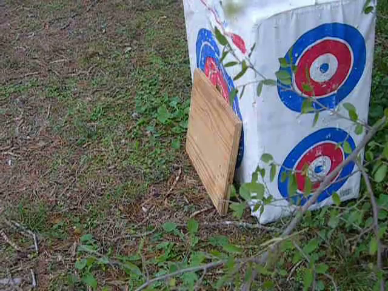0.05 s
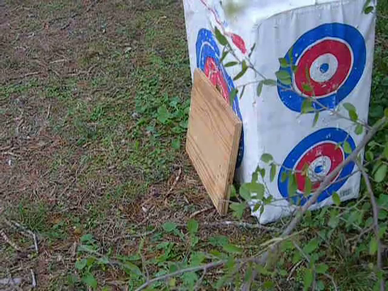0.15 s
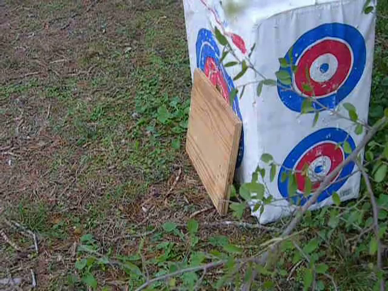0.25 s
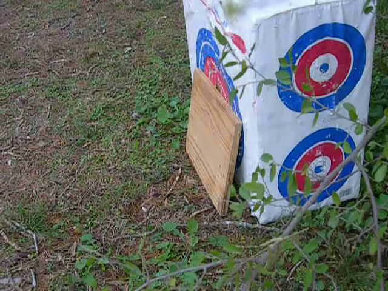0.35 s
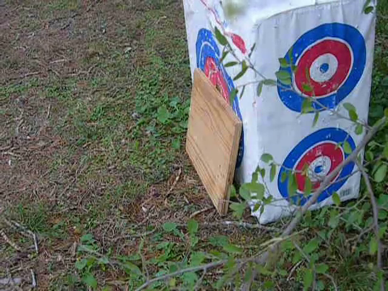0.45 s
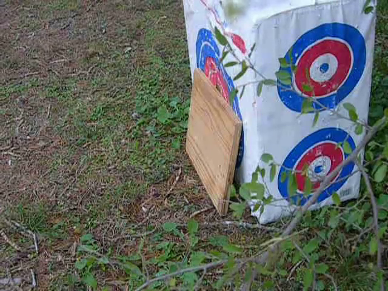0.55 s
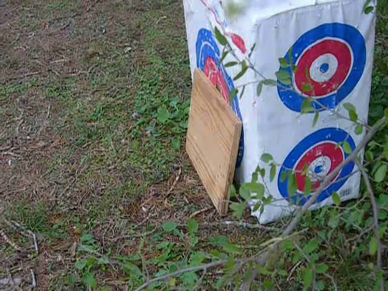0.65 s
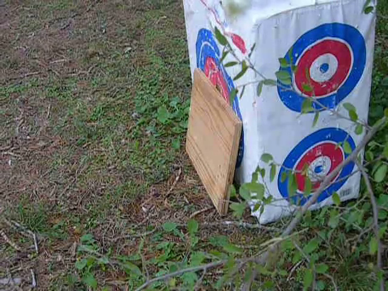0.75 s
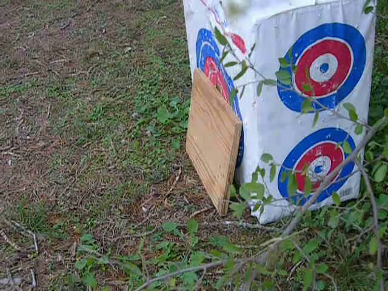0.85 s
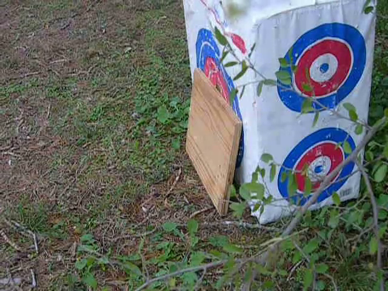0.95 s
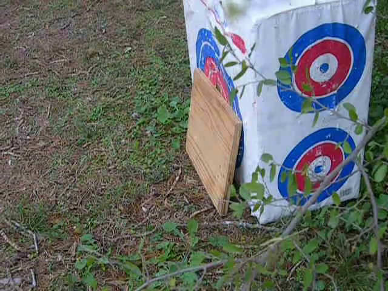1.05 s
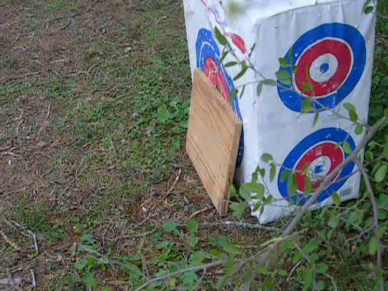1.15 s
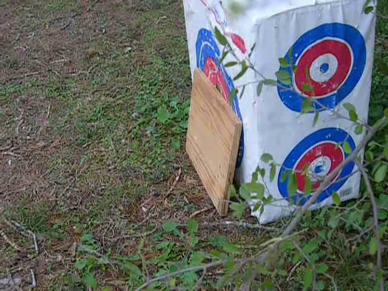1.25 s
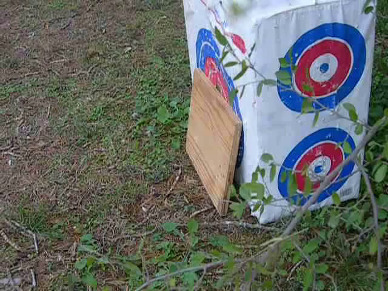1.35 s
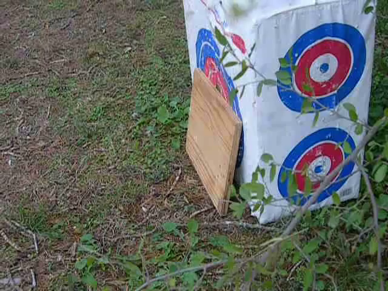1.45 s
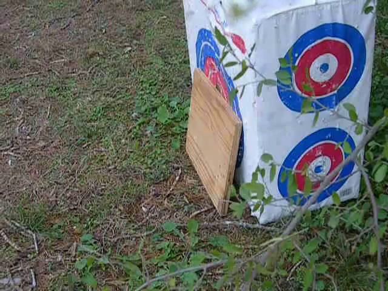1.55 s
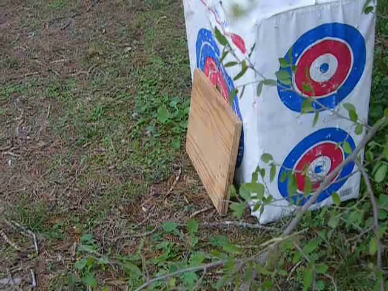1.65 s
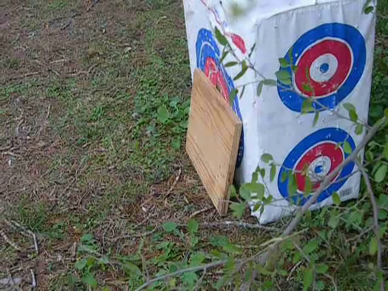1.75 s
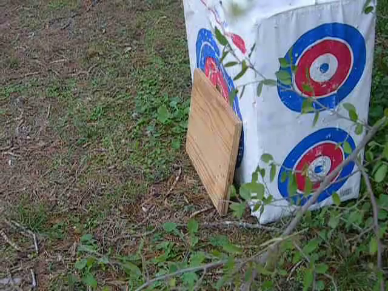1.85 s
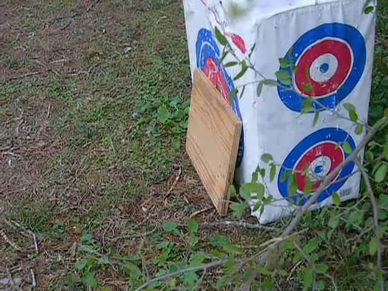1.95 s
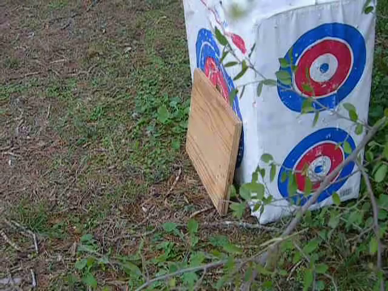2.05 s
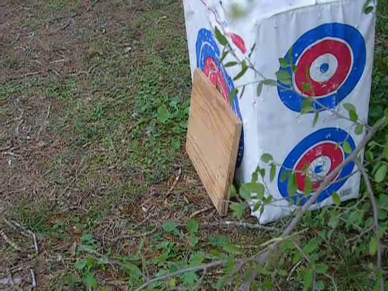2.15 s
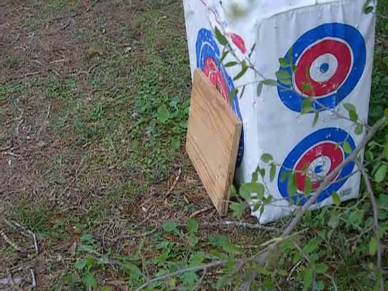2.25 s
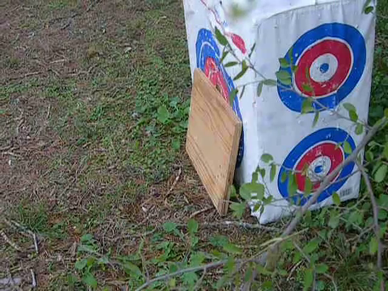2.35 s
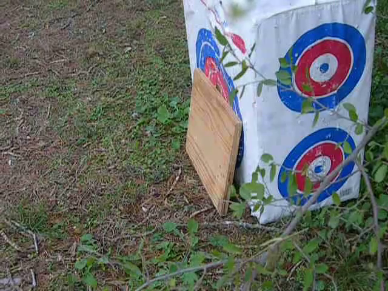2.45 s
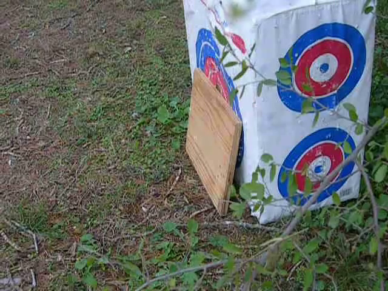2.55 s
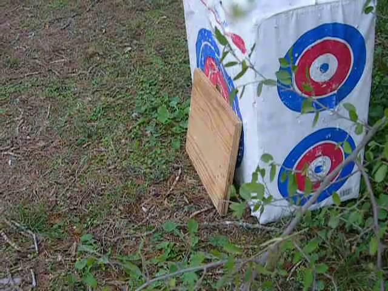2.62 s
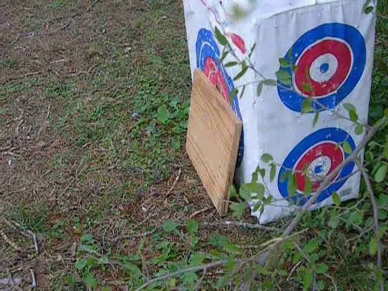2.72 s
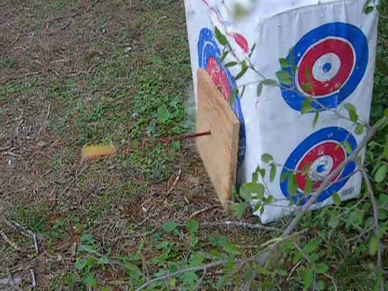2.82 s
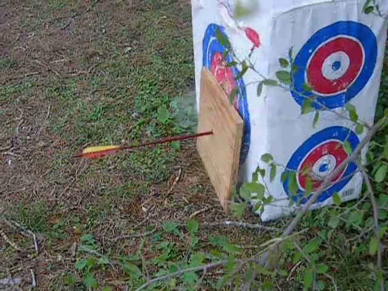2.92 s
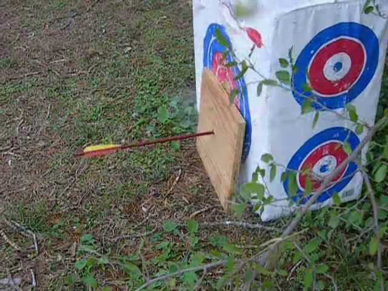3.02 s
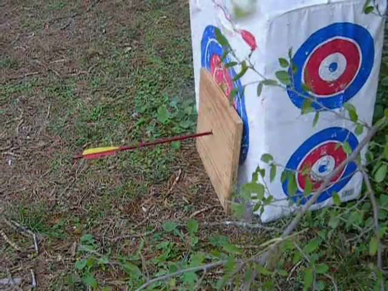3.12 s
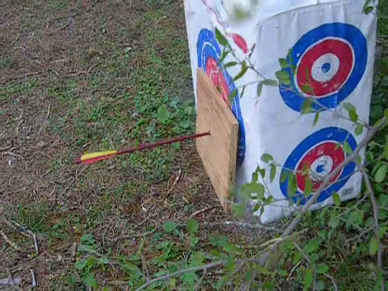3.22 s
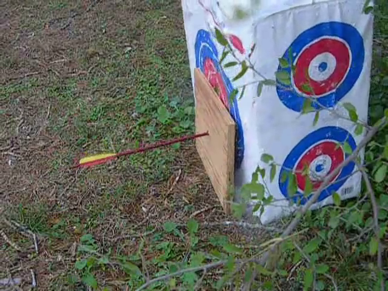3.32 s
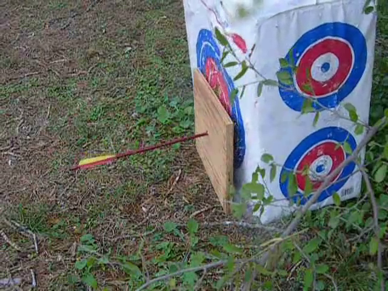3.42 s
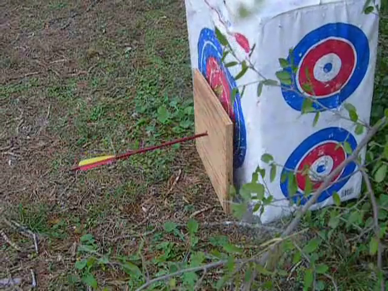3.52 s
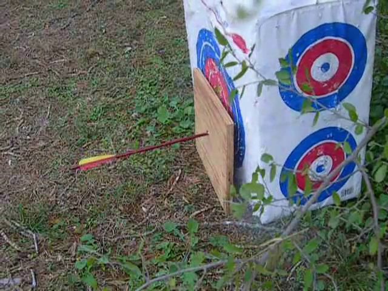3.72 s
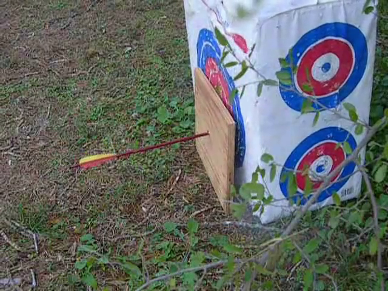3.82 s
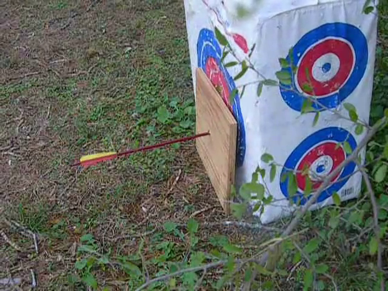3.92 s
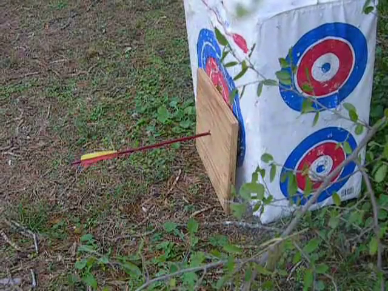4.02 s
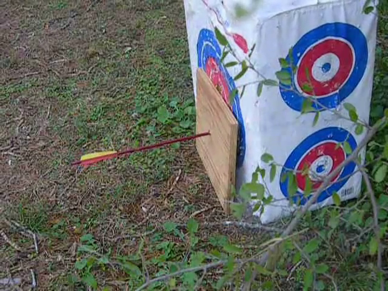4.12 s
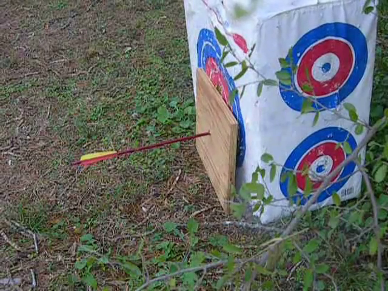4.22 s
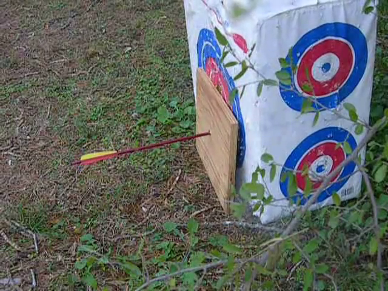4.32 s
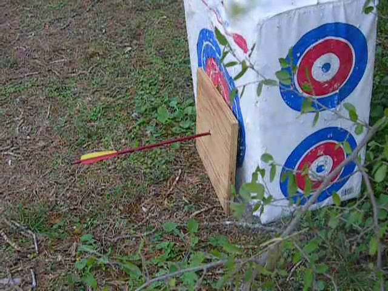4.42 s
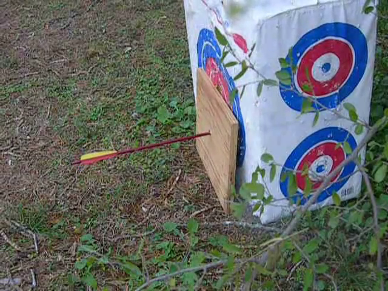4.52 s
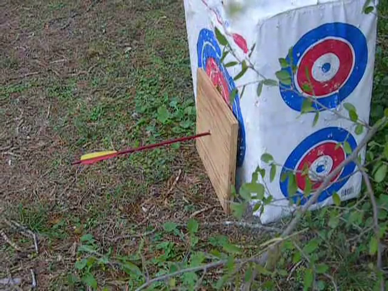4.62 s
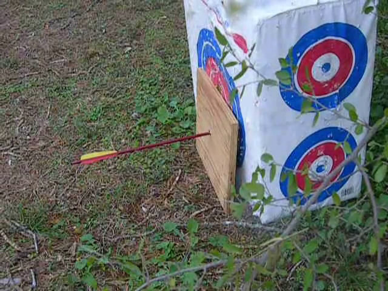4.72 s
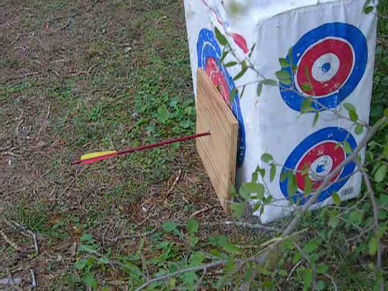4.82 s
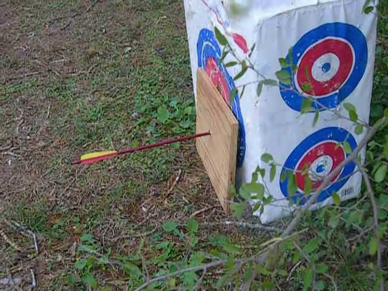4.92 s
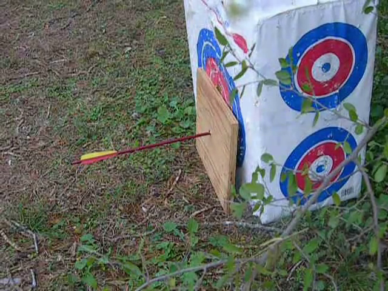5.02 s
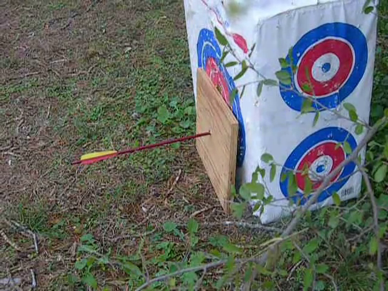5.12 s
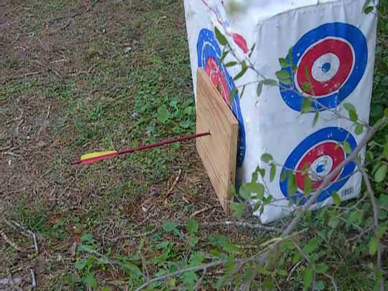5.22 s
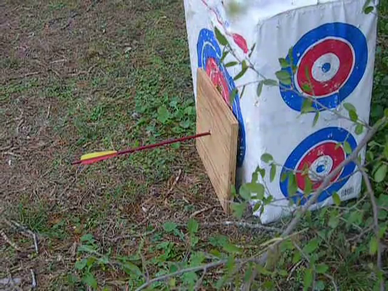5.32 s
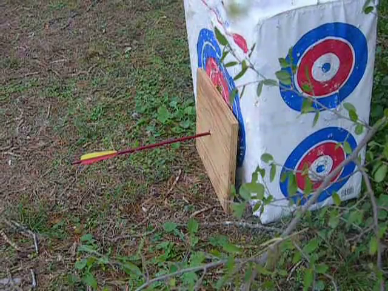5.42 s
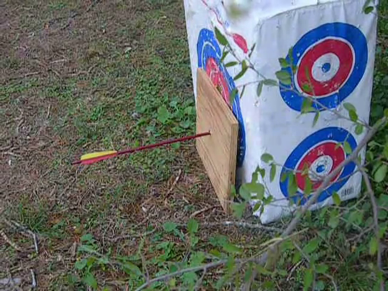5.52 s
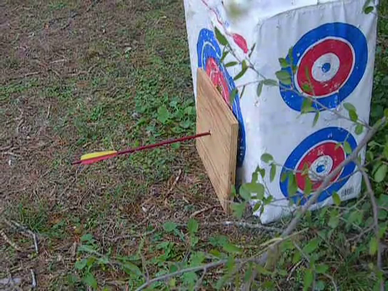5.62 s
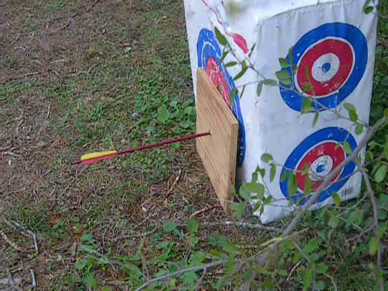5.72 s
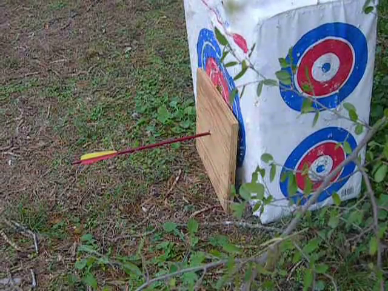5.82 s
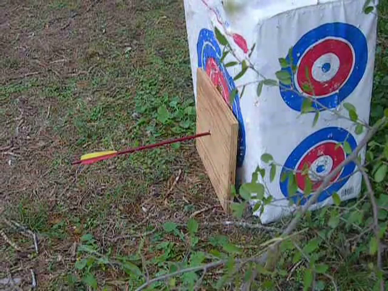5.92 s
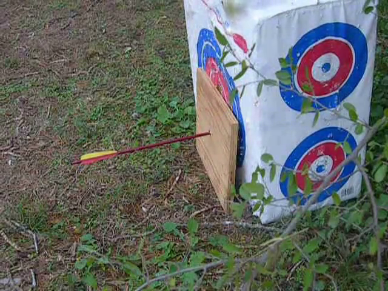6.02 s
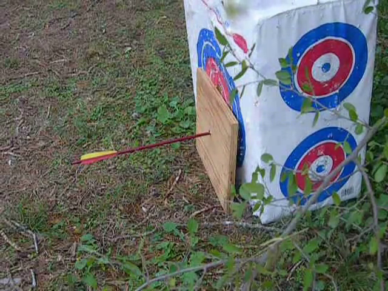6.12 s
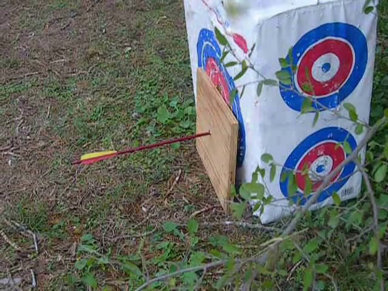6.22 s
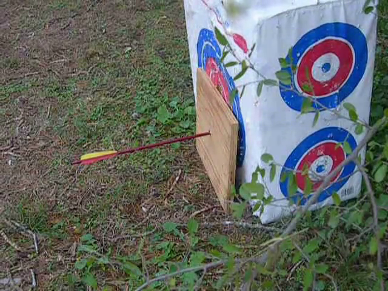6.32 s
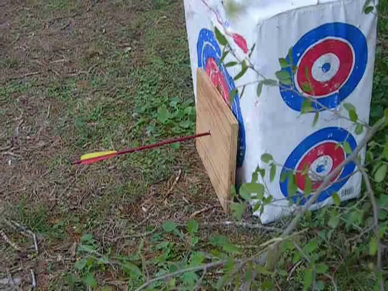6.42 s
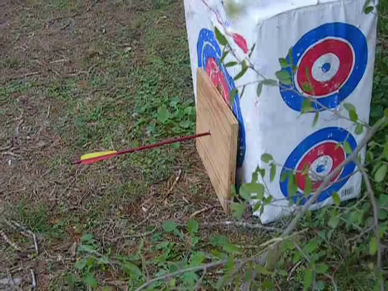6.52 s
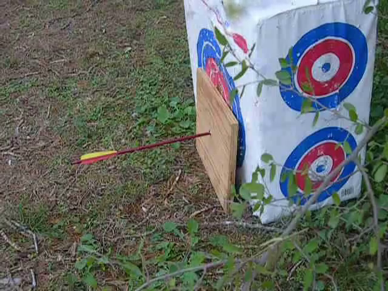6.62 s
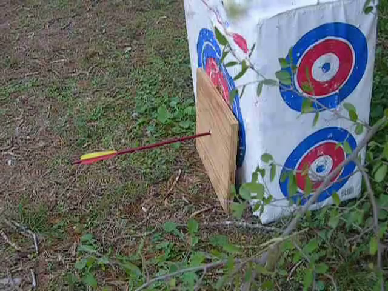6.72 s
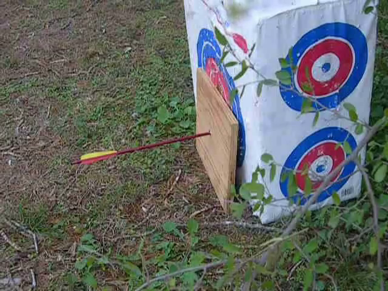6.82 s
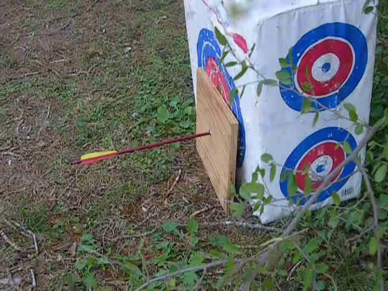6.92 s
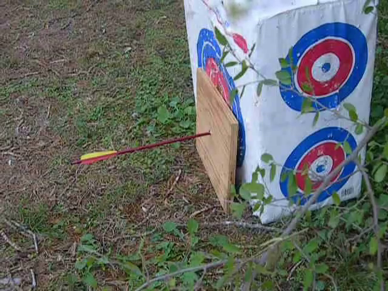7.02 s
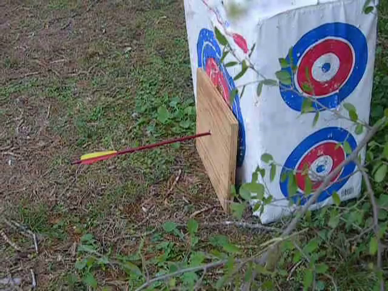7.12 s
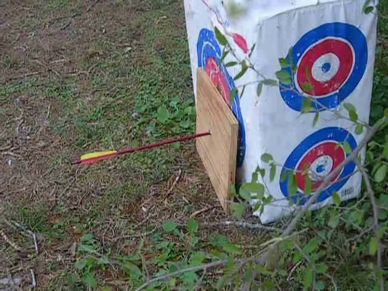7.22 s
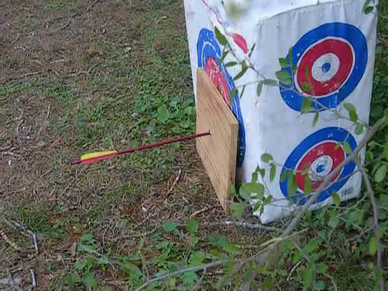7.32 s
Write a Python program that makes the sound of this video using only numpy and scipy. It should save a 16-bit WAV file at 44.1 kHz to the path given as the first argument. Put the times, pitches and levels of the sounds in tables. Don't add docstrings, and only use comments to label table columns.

```python
import sys
import numpy as np
from scipy import signal
from scipy.fft import rfft, irfft, next_fast_len
from scipy.io import wavfile
from scipy.ndimage import uniform_filter1d, map_coordinates

SR = 44100
rng = np.random.default_rng(int(sys.argv[2]) if len(sys.argv) > 2 else 0)


def field_ratio(decibels):
    return 10 ** (np.asarray(decibels, dtype=float) / 20)


def persist_wave(psi):
    counts = np.round(np.clip(psi, -1, 1) * 32767).astype(np.int16)
    wavfile.write(sys.argv[1], SR, np.atleast_2d(counts).T)


N = 324135

# frequency in Hz, density in dB per Hz.
HUM_SPECTRUM = [(88, -16), (150, -8), (317, -8.5), (390, -6), (505, -5.5), (729, -1.5), (871, -0.5),
                (945, -2.5), (1420, -7), (1870, -12), (2810, -13.5), (3500, -18.5), (3900, -56),
                (5070, -63), (8580, -120)]
# frequency in Hz, density in dB per Hz.
RUMBLE_SPECTRUM = [(12, -44), (20, -24), (32, -60), (49, -11), (135, 4.5), (220, -28.5), (290, -31),
                   (480, -120)]
# time in seconds, level in dB.
HUM_LEVEL = [(0, -38.5), (1.5, -38.5), (2.8, -39.5), (4.6, -38.5), (5.4, -39), (7, -39), (7.35, -37)]
# centre in seconds, lift over the rumble in dB.
PUFFS = [(.03, 6), (.255, 8), (.452, 14), (1.367, 1), (1.766, -4), (2.4, 12), (2.8, 3), (3.747, 0),
         (4.87, 5), (5.26, 8), (5.915, 13), (6.8, 9), (7.328, 2)]
PUFF_S = 0.056

# start in seconds, length in seconds, pitch in Hz, level in dB.
PEEPS = [(0, .085, 2640, -47.5), (.085, .28, 2620, -60), (.01, .12, 2360, -56), (.77, .11, 2950, -56),
         (1.69, .03, 2870, -49), (2.095, .03, 3160, -52), (2.63, .05, 2590, -55),
         (3.536, .022, 2950, -44.5), (3.98, .05, 2420, -54), (4.34, .03, 2360, -59),
         (4.535, .045, 2880, -53), (4.63, .09, 2870, -54), (4.74, .05, 2860, -52),
         (4.825, .04, 2850, -50.5), (5.02, .09, 3240, -59), (5.98, .11, 2800, -55.5),
         (6.11, .045, 2750, -53), (6.16, .11, 2750, -53.5), (6.52, .02, 2600, -52)]
# start in seconds, length in seconds, start pitch in Hz, end pitch in Hz, level in dB.
SLURS = [
    (2.305, .065, 3300, 2620, -51),
    (4.885, .1, 3450, 2580, -49.5),
    (4.98, .026, 2650, 3120, -51),
    (5.135, .065, 2000, 2360, -54),
    (5.2, .1, 2330, 2790, -57),
    (5.93, .05, 3080, 2920, -57),
    (6.535, .095, 1950, 2600, -53.5),
    (6.6, .05, 3400, 2900, -55),
    (6.67, .09, 2430, 2570, -58.5),
    (7.3, .049, 2780, 2400, -53),
]
# start in seconds, top pitch in Hz, level in dB.
CHIPS = [
    (2.113, 3070, -45.5),
    (2.12, 3310, -48.5),
    (5.03, 2910, -52.5),
]
PEEP_SAG_HZ_PER_S, SLUR_EASE, WARBLE_HZ = 150, 1.9, 15
CHIP_S, CHIP_DEPTH_HZ = 0.05, 480

# start in seconds, level in dB, pitch in Hz.
ROCKS = [
    (.61, -34, 595),
    (2.884, -33.5, 545),
    (3.1543, -15.5, 552),
    (3.156, -32, 620),
    (3.205, -19, 605),
    (3.222, -17, 555),
    (3.295, -25, 552),
    (3.505, -34, 565),
]
# start in seconds, level in dB, pitch in Hz.
TWIGS = [
    (.399, -37, 800),
    (.8468, -23, 630),
    (.8472, -28, 1020),
    (3.1545, -17, 784),
    (3.561, -27, 800),
    (4.652, -38, 1100),
    (6.889, -30, 800),
]
ROCK_T60_S, TWIG_T60_S = 0.23, 0.025

# time in seconds, crack level in dB.
SLAPS = [(2.947, -30), (2.9494, -19.5), (2.9516, -12), (2.9528, -17.5), (2.961, -13.5), (2.966, -21.5),
         (2.977, -17), (2.985, -19), (2.994, -28.5), (3.001, -20.5), (3.011, -26), (3.025, -30),
         (3.035, -32.5), (3.054, -35)]
# frequency in Hz, level in dB, t60 in seconds.
LIMB_MODES = [(124.5, -11.5, 0.16), (253, -7.5, 0.051), (303, 1, 0.058), (430, -5.5, 0.082),
              (545, -4, 0.11), (616, -9, 0.079), (722, -9, 0.12), (790, -10.5, 0.097), (970, -8.5, 0.069),
              (1130, -23, 0.029)]
# frequency in Hz, width in Hz, level in dB.
STOCK_PEAKS = [(700, 790, -9), (1490, 520, 1.5), (2170, 170, 0.5), (2700, 700, 0.5), (3300, 340, 1.5)]
# frequency in Hz, width in Hz, level in dB.
THUD_PEAKS = [(230, 300, 2), (1040, 730, -11)]
STRING_STOP_S, CATCH_T60_S, CRACK_T60_S = 2.952, 0.014, 0.056
LIMB_FREE_DB, LIMB_HIT_DB, LIMB_GROWS_DB, LIMB_GROWS_S = -12, 2, 7.5, 0.037
THUD_DB, THUD_T60_S = -6, 0.046
BOW_LOW_HZ = 75

# frequency in Hz, level in dB, t60 in seconds.
LATCH_MODES = [(1310, -10, .03), (1590, -7, 0.054), (2620, 1, 0.049), (2890, 8.5, 0.025),
               (3090, -0.5, 0.096)]
# time in seconds, level in dB.
RELEASE = (2.9493, -8.5)

# time in seconds, level in dB.
FLIGHT = [
    (2.98, -39),
    (3.03, -26),
    (3.06, -32.5),
    (3.08, -28),
    (3.092, -25),
    (3.096, -65),
]
# frequency in Hz, width in Hz, level in dB.
VANE_PEAKS = [(1100, 2000, -6), (2300, 870, 0.5), (2870, 620, 0.5)]

# time in seconds, force in dB, squeal pitch in Hz.
PIERCE = [
    (3.092, -40, 2350),
    (3.0926, 2, 2300),
    (3.0962, 4, 2230),
    (3.0977, 4, 1780),
    (3.099, 2, 2450),
    (3.1, -9, 2550),
    (3.1045, -13, 2050),
    (3.106, -21, 2050),
    (3.14, -50, 2250),
]
# frequency in Hz, width in Hz, level in dB.
PLY_PEAKS = [(800, 820, -11), (1690, 270, -5.5), (2280, 1000, -14.5), (2720, 300, -6)]
# frequency in Hz, level in dB, t60 in seconds.
BOARD_MODES = [(124, 3.5, 0.028), (332, -2, 0.047), (552, 1, 0.19), (587, -5, 0.06), (680, -3.5, 0.094),
               (800, -8, 0.094), (936, 4, 0.04), (1180, -12, .04), (1560, 0, 0.031), (2030, 1, 0.036),
               (2400, -31, .1)]
# time in seconds, level in dB.
SLAMS = [
    (3.093, -41),
    (3.0965, -11.5),
    (3.0995, -12),
]

# frequency in Hz, width in Hz, level in dB.
ANSWER_PEAKS = [(800, 460, -9), (2150, 420, 2), (2900, 690, -10)]
# start in seconds, level in dB, t60 in seconds.
GROVE = (3.125, -29, 2.1)
# arrival in seconds, level in dB.
TRUNKS = [
    (3.112, -42),
    (3.175, -24.5),
    (3.2, -27),
    (3.294, -36),
    (3.339, -39),
]
# arrival in seconds, level in dB.
WALL = [
    (3.544, -40),
    (3.5605, -31),
    (3.571, -41),
    (3.61, -42),
]
TRUNK_T60_S, WALL_T60_S = 0.11, 0.049

DUCK_S, DUCK_DB, DUCK_ATTACK_S, RECOVER_DB_PER_S, RECOVERED_S = 3.1, 12, 0.043, 24, 3.806
SAMPLE_HZ, EDGE_HZ = 7881.03, 2976


def unit(x):
    return x / np.sqrt(np.mean(x ** 2) + 1e-20)


def curves(rows):
    knot_s, *columns = np.transpose(rows)
    return [np.interp(np.arange(N) / SR, knot_s, column) for column in columns]


def wobble(rate_hz):
    knots = rng.standard_normal(int(N * rate_hz / SR) + 4)
    return map_coordinates(knots, [np.arange(N) * rate_hz / SR])


def filtered(x, response):
    size = next_fast_len(N + SR // 2)
    return irfft(rfft(x, size) * response(np.fft.rfftfreq(size, 1 / SR)), size)[..., :N]


def resonant(peaks):
    def response(f):
        total = 0
        for k, (hz, width_hz, db) in enumerate(peaks):
            damping = 1j * f * width_hz
            total = total + (-1) ** k * field_ratio(db) * damping / (hz * hz - f * f + damping)
        return total
    return response


def coloured(spectrum):
    hz, db = np.transpose(spectrum)
    noise = rng.standard_normal(N)
    return unit(filtered(noise, lambda f: field_ratio(np.interp(np.log(f + 1), np.log(hz + 1), db))))


def ring(start_s, modes, attack_s, spread_db):
    t = np.arange(SR // 2) / SR
    hz, db, t60_s = np.transpose(modes)[:, :, None]
    db = db + spread_db * rng.standard_normal(hz.shape)
    partials = field_ratio(db - 60 * t / t60_s) * np.sin(2 * np.pi * hz * t)
    out = np.zeros(N + SR)
    out[round(start_s * SR):][:len(t)] = partials.sum(0) * (1 - np.exp(-t / attack_s))
    return out[:N]


def dying(rows):
    out = np.zeros(N)
    for start_s, db, t60_s in rows:
        part = out[round(start_s * SR):][:round(2 * t60_s * SR)]
        part += field_ratio(db - 60 * np.arange(len(part)) / SR / t60_s)
    return out


def background():
    t = np.arange(N) / SR
    hum = field_ratio(curves(HUM_LEVEL)[0] + 0.33 * wobble(8.8)) * coloured(HUM_SPECTRUM)
    lift_db = sum(db * np.exp(-((t - s) / PUFF_S) ** 2) for s, db in PUFFS)
    rumble = field_ratio(-62 + lift_db + 1.1 * wobble(9)) * coloured(RUMBLE_SPECTRUM)
    return hum + rumble


def birds():
    def span(length_s):
        return np.linspace(0, 1, round(length_s * SR))

    notes = []
    for s, length_s, hz, db in PEEPS:
        notes.append((s, db, hz - PEEP_SAG_HZ_PER_S * length_s * span(length_s)))
    for s, length_s, start_hz, end_hz, db in SLURS:
        glide = (1 - span(length_s)) ** SLUR_EASE
        notes.append((s, db, end_hz + (start_hz - end_hz) * glide))
    for s, top_hz, db in CHIPS:
        notes.append((s, db, top_hz - CHIP_DEPTH_HZ * (2 * span(CHIP_S) - 1) ** 2))

    whistles = np.zeros(N + SR)
    warble_hz = WARBLE_HZ * wobble(60)
    for s, db, hz in notes:
        start = round(s * SR)
        hz = hz + warble_hz[start:][:len(hz)]
        swell = np.sin(np.pi * np.arange(len(hz)) / len(hz)) ** 0.4
        whistles[start:][:len(hz)] += field_ratio(db + 7.5) * swell * np.sin(2 * np.pi * np.cumsum(hz) / SR)
    leaves = rng.standard_normal(SR // 8) * field_ratio(-60 * np.arange(SR // 8) / SR / 0.054)
    smear = signal.fftconvolve(whistles, leaves / np.linalg.norm(leaves))
    return whistles[:N] * field_ratio(1.5 * wobble(60)) + field_ratio(-6) * smear[:N]


def knocks():
    out = np.zeros(N)
    for rows, t60_s in [(ROCKS, ROCK_T60_S), (TWIGS, TWIG_T60_S)]:
        for s, db, hz in rows:
            out += ring(s, [(hz, db, t60_s)], 0.00049, 0)
    return out


def bow():
    s, db = np.transpose(SLAPS)
    late_s = s - STRING_STOP_S
    hit_db = LIMB_HIT_DB + LIMB_GROWS_DB * np.tanh(late_s / LIMB_GROWS_S)
    limb_db = db + np.where(late_s > 0, hit_db, LIMB_FREE_DB)

    grit = rng.standard_normal(N) * field_ratio(2.5 * wobble(600))
    t60_s = np.where(late_s > 0, CRACK_T60_S, CATCH_T60_S)
    rattle = unit(filtered(grit, resonant(STOCK_PEAKS))) * dying(zip(s, db, t60_s))
    thud_rows = [(at, d + THUD_DB, THUD_T60_S) for at, d in zip(s, limb_db)]
    thud = unit(filtered(grit[::-1], resonant(THUD_PEAKS))) * dying(thud_rows)

    impulses = np.zeros(N)
    impulses[np.round(s * SR).astype(int)] = field_ratio(db + 12)
    clicks = filtered(impulses, resonant(STOCK_PEAKS))
    limbs = sum(field_ratio(d - 3.5) * ring(at, LIMB_MODES, 0.0034, 4.8) for at, d in zip(s, limb_db))
    return rattle + thud + clicks + limbs


def latch():
    release_s, release_db = RELEASE
    return field_ratio(release_db) * ring(release_s, LATCH_MODES, 0.0008, 0)


def bolt():
    t = np.arange(N) / SR
    hiss = filtered(rng.standard_normal(N) * field_ratio(1.6 * wobble(200)), resonant(VANE_PEAKS))
    flying = (t > FLIGHT[0][0]) * (t < FLIGHT[-1][0])
    return unit(hiss) * field_ratio(curves(FLIGHT)[0]) * flying


def strike():
    t = np.arange(N) / SR
    force_db, squeal_hz = curves(PIERCE)
    squeal = 0.97 * np.sin(2 * np.pi * np.cumsum(squeal_hz) / SR)
    fibres = 0.45 * unit(filtered(rng.standard_normal(N), resonant(PLY_PEAKS)))
    piercing = (t > PIERCE[0][0]) * (t < PIERCE[-1][0])
    split = (squeal + fibres) * field_ratio(force_db) * piercing
    return split + sum(field_ratio(db) * ring(s, BOARD_MODES, 0.00086, 3.4) for s, db in SLAMS)


def wood():
    answer = rng.standard_normal(N) * field_ratio(1.2 * wobble(70))
    echoes = [GROVE]
    echoes += [(s, db, TRUNK_T60_S) for s, db in TRUNKS]
    echoes += [(s, db, WALL_T60_S) for s, db in WALL]
    envelope = uniform_filter1d(dying(echoes), size=60)
    return unit(filtered(answer, resonant(ANSWER_PEAKS))) * envelope


def duck_db():
    t = np.arange(N) / SR
    down_db = DUCK_DB * (1 - np.exp(-np.maximum(t - DUCK_S, 0) / DUCK_ATTACK_S))
    return -np.minimum(down_db, RECOVER_DB_PER_S * np.maximum(RECOVERED_S - t, 0))


def scene():
    bow_highpass = signal.butter(2, BOW_LOW_HZ, "high", fs=SR, output="sos")
    shot = signal.sosfilt(bow_highpass, bow())
    mix = background() + birds() + knocks() + shot + latch() + bolt() + strike() + wood()
    return mix[None]


def low_pass(x):
    return signal.sosfilt(signal.butter(12, 15540, fs=SR, output="sos"), x)


def record(dry):
    x = dry * field_ratio(duck_db())
    x = signal.sosfilt(signal.butter(6, EDGE_HZ, fs=SR, output="sos"), x)
    hiss = filtered(rng.standard_normal(N), lambda hz: hz < SAMPLE_HZ / 2)
    x = x + field_ratio(-64) * hiss
    x = np.clip(x, -0.93, 0.95) - 0.0186
    tick = np.floor(np.arange(N) * SAMPLE_HZ / SR)
    held = map_coordinates(x[0], [tick * SR / SAMPLE_HZ], order=1)
    return low_pass(held[None])


dry = scene()
out = record(dry)
persist_wave(out)
```